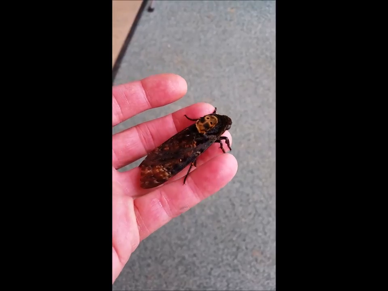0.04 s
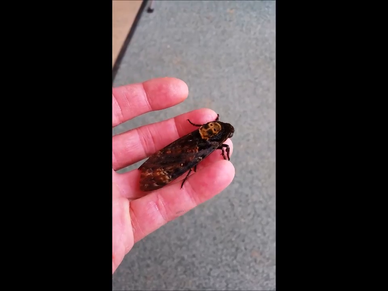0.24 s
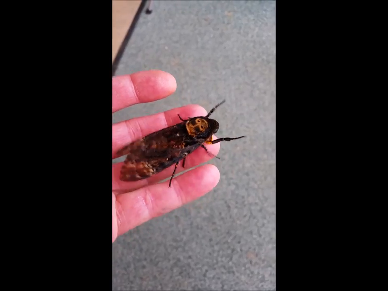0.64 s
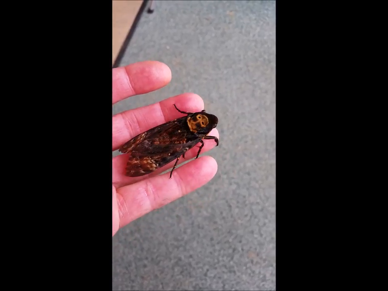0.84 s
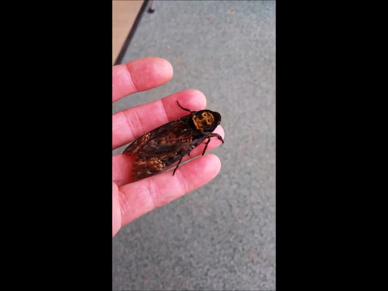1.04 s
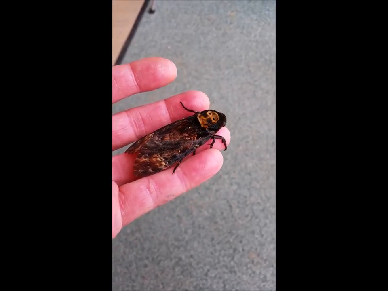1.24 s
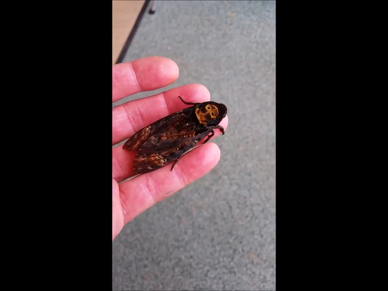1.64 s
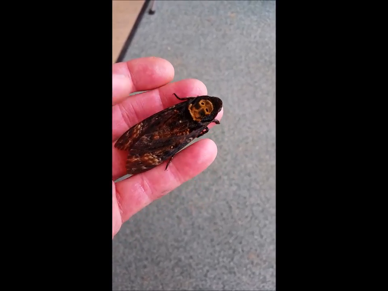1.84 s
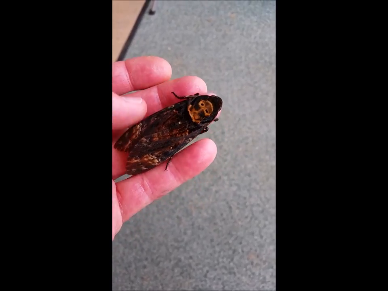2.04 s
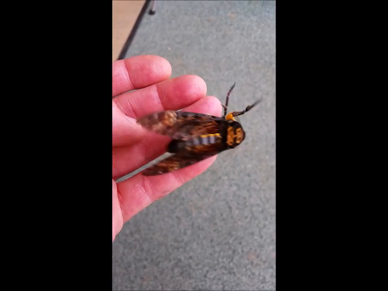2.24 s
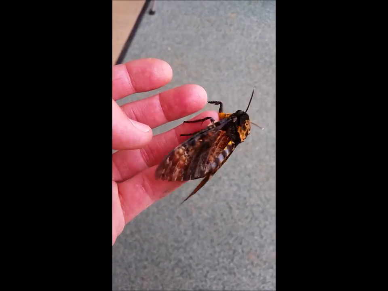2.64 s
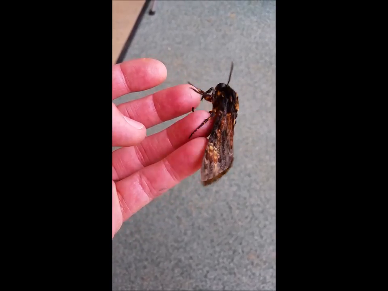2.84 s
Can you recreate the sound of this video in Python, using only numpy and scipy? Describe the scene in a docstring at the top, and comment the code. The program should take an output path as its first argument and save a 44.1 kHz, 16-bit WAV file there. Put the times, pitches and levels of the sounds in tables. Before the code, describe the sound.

A moth held on a hand squeaks near the end of a quiet outdoor moment of light wind on the microphone, far traffic and very faint birds. Its two brief, shrill rasps sound close on the left, a thin whistle between them.

```python
"""A hawkmoth squeaks on a hand, close to the left microphone. Sucking air in flutters a flap in its
throat: a rasp of sharp clicks that slows as it swells. Blowing the air out gives a thin falling
whistle, and a short second rasp follows. The hand scatters the clicks and nearby walls echo them.
Distant traffic, a soft hiss, light puffs of wind on the microphones and faint birds lie underneath."""
import sys
import numpy as np
from scipy import signal
from scipy.fft import rfft, irfft, next_fast_len
from scipy.io import wavfile
from scipy.ndimage import map_coordinates

SR = 44100
rng = np.random.default_rng(int(sys.argv[2]) if len(sys.argv) > 2 else 0)


def wrap_up_sound(samples):
    """Save the sound to the file named by the first command line argument, as 16-bit audio."""
    columns = np.atleast_2d(samples).T
    # keep every value between -1 and 1, then stretch to whole-number steps
    tamed = np.clip(columns, -1, 1)
    steps = np.round(tamed * 32767).astype(np.int16)
    wavfile.write(sys.argv[1], SR, steps)


N = 132300  # 3 seconds

# The tone colour of the moth's clicks and breath. Each row: frequency in Hz, relative level in dB.
MOTH_COLOUR = [(1500, -44), (3000, -24), (4300, -17), (5300, -39), (7500, -33), (9500, -8), (11700, 2),
               (13500, 3), (15800, -3)]


def amp(db):
    """Turn decibels into a number to multiply a sound by."""
    return 10 ** (np.asarray(db) / 20)


def unit(x):
    """Scale a sound to an average power of 1."""
    return x / np.sqrt(np.mean(x ** 2) + 1e-20)


def along(points, hz):
    """Read between rows of frequency and value, giving every octave the same room."""
    freqs, values = np.transpose(points)
    return np.interp(np.log(hz + 1), np.log(freqs + 1), values)


def curves(rows):
    """Turn each column after the time into a curve with one value per sample."""
    seconds, *columns = np.transpose(rows)
    return [np.interp(np.arange(N) / SR, seconds, column) for column in columns]


def wobble(rate):
    """A smooth curve through `rate` random values a second."""
    return map_coordinates(rng.standard_normal(int(N * rate / SR) + 4), [np.arange(N) * rate / SR])


def sine(hz):
    """A pure tone that follows a pitch curve."""
    return np.sin(2 * np.pi * np.cumsum(hz) / SR)


def pan(left_db):
    """Left and right gains that make the left side louder by left_db at the same total power."""
    gains = np.vstack([amp(left_db / 2), amp(-left_db / 2)])
    return gains / np.sqrt(np.mean(gains ** 2, axis=0))


def filtered(x, response):
    """Multiply each frequency in a sound by response(hz)."""
    size = next_fast_len(N + SR // 2)
    return irfft(rfft(x, size) * response(np.fft.rfftfreq(size, 1 / SR)), size)[..., :N]


def ring(x, colour, size=1024):
    """Give a sound a tone colour that rings after each click, never before it."""
    log_gain = np.log(amp(along(colour, np.fft.rfftfreq(size, 1 / SR))))
    lags = irfft(log_gain)
    lags[1:size // 2] *= 2  # move the early half of the ringing to the late half
    lags[size // 2 + 1:] = 0
    return signal.fftconvolve(x, irfft(np.exp(rfft(lags))))[:N]


def noise(colour, alike=((1, 0),), balance=((1, 0),)):
    """Stereo noise of power 1; tables set its colour, how alike the sides are and which is louder."""
    def weights(hz):
        angle = np.arccos(np.clip(along(alike, hz), -1, 1)) / 2
        return amp(along(colour, hz)) * [np.cos(angle), np.sin(angle)]
    shared, opposite = filtered(rng.standard_normal((2, N)), weights)
    sides = np.array([shared + opposite, shared - opposite])
    return unit(filtered(sides, lambda hz: pan(along(balance, hz))))


def echo(x, fade_s):
    """A blur of reflections, different on each side, that drops 60 dB in fade_s seconds."""
    t = np.arange(SR // 2) / SR
    tail = rng.standard_normal((2, len(t))) * amp(-60 * t / fade_s)
    tail /= np.linalg.norm(tail, axis=1, keepdims=True)
    return signal.fftconvolve(x[None], tail, axes=1)[:, :N]


def impulses(times, gains):
    """Sharp spikes at exact times, even between two samples."""
    at = times[:, None] * SR
    index = np.floor(at).astype(int) + np.arange(-7, 9)
    shape = np.sinc(index - at) * np.cos(np.pi * (index - at) / 16) ** 2
    return np.bincount(index.ravel(), (gains[:, None] * shape).ravel(), N)[:N]


def traffic():
    """Distant traffic makes a low wash of noise that swells and sinks."""
    # Its loudness. Each row: time in seconds, relative level in dB.
    loudness = [(0.0, -67.5), (0.04, -64.5), (0.26, -66), (0.8, -62.5), (0.93, -59.5), (1.78, -62.5),
                (2.28, -63.5), (2.3, -59.5), (3.0, -65.5)]
    # Its tone colour. Each row: frequency in Hz, relative level in dB.
    colour = [(60, -7), (130, 1), (200, -2.5), (275, -0.5), (370, -10), (470, -14.5), (680, -14.5),
              (1000, -20), (1600, -27), (2300, -32), (3000, -39.5), (4500, -69.5)]
    # How alike the two sides are. Each row: frequency in Hz, likeness from 0 to 1.
    alike = [(100, 1), (280, 0.82), (600, 0.46), (1200, 0.12), (4000, 0)]
    # Which side is louder. Each row: frequency in Hz, left over right in dB.
    balance = [(150, 2.5), (330, -5), (550, 4), (1000, -3), (1600, 1.5)]
    return amp(curves(loudness)[0] + 8) * noise(colour, alike, balance)


def soft_hiss():
    """A narrow band of hiss near 4 kHz, mostly on the left, whose level flickers slightly."""
    # Its loudness. Each row: time in seconds, level in dB.
    loudness = [(0.0, -75), (0.14, -71.5), (0.22, -74.5), (0.43, -72), (0.98, -66), (2.22, -70), (2.6, -69),
                (3, -73.5)]
    # Its tone colour. Each row: frequency in Hz, relative level in dB.
    colour = [(2400, -38), (3100, -20), (3600, -6), (4000, 1), (4350, 1.5), (4700, -5), (5100, -18.5),
              (6200, -24), (7500, -38), (10000, -53)]
    # Which side is louder. Each row: frequency in Hz, left over right in dB.
    balance = [(3200, -0.5), (4300, 15), (5200, -2)]
    return amp(curves(loudness)[0] + 0.48 * wobble(34)) * noise(colour, balance=balance)


def airy_hiss():
    """A very high, airy hiss that comes and goes."""
    # Its loudness. Each row: time in seconds, level in dB.
    loudness = [(0, -78), (.55, -77), (.7, -69.5), (1.05, -68.5), (1.55, -72), (1.9, -74.5), (2.05, -68),
                (2.22, -71.5), (2.45, -59), (2.62, -66), (2.8, -70), (3, -76.5)]
    # Its tone colour. Each row: frequency in Hz, relative level in dB.
    colour = [(7000, -37), (10000, -23.5), (11000, -16.5), (13000, -11.5), (15500, -6.5)]
    return amp(curves(loudness)[0]) * noise(colour) * pan(left_db=5)


def wind():
    """Wind rumbles unsteadily, and small swirls of air push on the microphones in short puffs."""
    # The rumble's loudness. Each row: time in seconds, level in dB.
    loudness = [(0, -60.5), (.6, -56.5), (1, -60), (1.3, -64), (1.8, -56.5), (2.2, -60), (2.45, -63),
                (3, -65)]
    # The rumble's tone colour. Each row: frequency in Hz, relative level in dB.
    colour = [(12, -1), (35, 8), (70, 3), (120, 0), (180, -13.5), (400, -53.5)]
    # The puffs. Each row: middle and half length in seconds, level in dB, pitch in Hz,
    # left over right in dB.
    puffs = [(0.077, 0.0053, -41.5, 55, -10), (0.294, 0.012, -37.5, 41, 31), (0.407, 0.022, -46.5, 55, 19),
             (0.664, 0.01, -41, 90, 1.5), (0.78, 0.015, -33, 78, 35), (0.89, 0.0082, -27, 56, 31),
             (0.969, 0.026, -39, 75, 12), (1.053, 0.031, -32.5, 64, 26), (1.252, 0.016, -41, 65, 14),
             (1.36, 0.0072, -35.5, 70, 24), (1.48, 0.012, -39.5, 50, 27), (1.54, 0.013, -41.5, 85, -21),
             (1.718, 0.03, -42.5, 44.8, 19), (1.865, 0.028, -52, 44.9, 12), (1.987, 0.018, -47, 40, 27),
             (2.133, 0.0052, -40.5, 75, -16), (2.527, 0.033, -52, 65, 5)]
    pitch_wander = 0.253  # as a share of the pitch
    t = np.arange(N) / SR
    rumble = unit(noise(colour) * amp(2.5 * np.array([wobble(14), wobble(14)])))
    out = amp(curves(loudness)[0]) * rumble * pan(left_db=-2.5)
    for middle, half, db, hz, left_db in puffs:
        swell = (1 + ((t - middle) / half) ** 2) ** -1.3
        pitch = hz * (1 + pitch_wander * wobble(70))
        phase = 2 * np.pi * (np.cumsum(pitch) / SR + rng.random())
        out += amp(db) * swell * np.sin(phase) * pan(left_db)
    return out


def birds():
    """Far birds sing thin, wavering notes with a short echo."""
    # The notes. Each row: middle and half length in seconds, pitch in Hz, slide in Hz per second,
    # level in dB.
    notes = [(.895, .01, 4200, 0, -69), (1.398, .016, 2950, -15000, -79), (1.76, .075, 3450, 0, -77.5),
             (2.025, .03, 3020, -1500, -83)]
    pitch_waver, flutter_db = .018, 2
    out = np.zeros(N)
    for middle, half, hz, slide, db in notes:
        from_middle = np.arange(N) / SR - middle
        pitch = hz * (1 + pitch_waver * wobble(500)) + slide * from_middle
        swell = np.exp(-(from_middle / half) ** 2)
        out += amp(db + flutter_db * wobble(80)) * swell * sine(pitch)
    return out + echo(out, fade_s=0.08) / 2


def throat_flap():
    """Air sucked in flutters a flap in the moth's throat, which clicks once on every swing."""
    # One table for each breath in. Each row: time in seconds, clicks per second, relative level in dB,
    # fullness from 0 (only the highest treble) to 1 (the whole click).
    breaths = [
        [(2.260, 790, -42, .1), (2.266, 660, -34, .1), (2.287, 595, -30, .3), (2.312, 515, -28, .8),
         (2.346, 365, -27, 1), (2.358, 280, -26.5, 1), (2.368, 170, -28, 1)],
        [(2.5135, 900, -41, .2), (2.518, 620, -30, .3), (2.522, 435, -26, .4), (2.527, 330, -24, .45),
         (2.5345, 215, -25, .5)],
    ]
    # Stray snaps as the air gives out. Each row: time in seconds, relative level in dB, fullness.
    last_snaps = [(2.3716, -27, 1), (2.3791, -32, 1), (2.3836, -32, 1), (2.5534, -26.5, 0.82),
                  (2.560, -27.5, 0.34)]
    jitter_s, uneven_db, boost_db, thin_edge_hz = .00003, 0.5, 10.5, 12700
    clicks = [np.array(last_snaps)]
    for breath in breaths:
        seconds, rate, db, fullness = np.transpose(breath)
        t = np.arange(seconds[0], seconds[-1], 1 / SR)
        swings = np.cumsum(np.interp(t, seconds, rate)) / SR
        times = np.interp(np.arange(swings[-1]), swings, t)
        later, louder = rng.standard_normal((len(times), 2)).T
        levels = np.interp(times, seconds, db) + uneven_db * louder
        fullness = np.interp(times, seconds, fullness)
        clicks.append(np.column_stack([times + jitter_s * later, levels, fullness]))
    times, db, fullness = np.vstack(clicks).T
    gains = amp(db + boost_db)
    full = impulses(times, gains * fullness)
    thin = impulses(times, gains * (1 - fullness))
    return full + filtered(thin, lambda hz: 1 - np.exp(-(hz / thin_edge_hz) ** 6))


def rasp():
    """The flap's clicks reach the microphones directly, off the hand and off nearby walls."""
    # How strong the reflections are as the moth shifts. Each row: time in seconds, gain in dB.
    reflection_level = [(2.26, 9), (2.3, 7), (2.35, 2), (2.39, 3), (2.52, 3), (2.56, -1.5)]
    # The tone colour of clicks scattered by the hand. Each row: frequency in Hz, relative level in dB.
    hand_colour = [(1800, -24), (3000, -29.5), (3900, -8.5), (4700, -6), (5200, -10.5), (5950, -1),
                   (6400, -2), (6800, -5.5), (7500, -5.5), (9000, -6.5), (11500, -2), (15800, -21)]
    # Which side the hand sends them to. Each row: frequency in Hz, left over right in dB.
    hand_balance = [(4000, -0.5), (6500, -10), (9000, -1), (12000, 7), (15500, 3)]
    # The tone colour of the walls' echo. Each row: frequency in Hz, relative level in dB.
    wall_colour = [(2000, -29.5), (4000, -12.5), (6000, -3.5), (8000, -4), (11500, -3.5), (15800, -9)]
    right_db, right_delay_s = -12, 0.000413  # the right microphone is shaded and hears each click later
    clicks = throat_flap()
    left = ring(clicks, MOTH_COLOUR)
    right = amp(right_db) * filtered(left, lambda hz: np.exp(-2j * np.pi * hz * right_delay_s))
    reflected = clicks * amp(curves(reflection_level)[0])
    hand = amp(-6.5) * echo(ring(reflected, hand_colour), fade_s=0.028)
    hand = filtered(hand, lambda hz: pan(along(hand_balance, hz)))
    walls = amp(-11.5) * echo(ring(reflected, wall_colour), fade_s=.45) * pan(left_db=-2.5)
    return np.array([left, right]) + hand + walls


def whistle():
    """Air blown out sings a wavering, falling tone over its own hiss and ends in a rough pip."""
    # The breath out. Each row: time in seconds, pitch in Hz, relative level in dB.
    breath = [(2.407, 9200, -64), (2.413, 9420, -54.5), (2.430, 9300, -54), (2.440, 8900, -54),
              (2.452, 8700, -58), (2.461, 8350, -65), (2.468, 8150, -76)]
    # How strongly each microphone hears the tone: left gain in dB, then right gain in dB.
    side_db = [-3, 1]
    pitch_waver, flutter_db, hiss_fade_db_per_s = .015, 3, 134
    pip_s, pip_half_s, pip_hz, pip_fall_hz_per_s = 2.4672, .002, 11300, 350000
    t = np.arange(N) / SR
    hz, db = curves(breath)
    start, end = breath[0][0], breath[-1][0]
    flow = amp(db) * (t > start) * (t < end)
    flutter = amp(flutter_db * wobble(360))
    tone = np.sqrt(2) * flow * flutter * sine(hz * (1 + pitch_waver * wobble(900)))
    from_pip = t - pip_s
    pip_pitch = pip_hz * (1 + .05 * wobble(3000)) - pip_fall_hz_per_s * from_pip
    pip = amp(-50) * np.exp(-(from_pip / pip_half_s) ** 2) * sine(pip_pitch)
    # The hiss is strongest as the air starts to flow.
    hiss = flow * amp(-hiss_fade_db_per_s * np.abs(t - start)) * noise(MOTH_COLOUR)
    direct = tone * amp(side_db)[:, None] + (hiss + pip) * pan(left_db=16)
    return direct + amp(-7) * echo(tone, fade_s=.16)


def scene():
    """The moth in front of the quiet outdoor sounds."""
    return rasp() + whistle() + wind() + birds() + traffic() + soft_hiss() + airy_hiss()


def record(dry):
    """The recorder keeps nothing above 15850 Hz."""
    return filtered(dry, lambda hz: hz < 15850)


dry = scene()
out = record(dry)
wrap_up_sound(out)
```